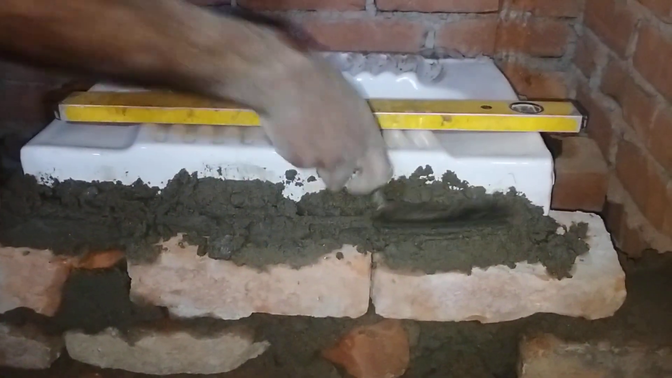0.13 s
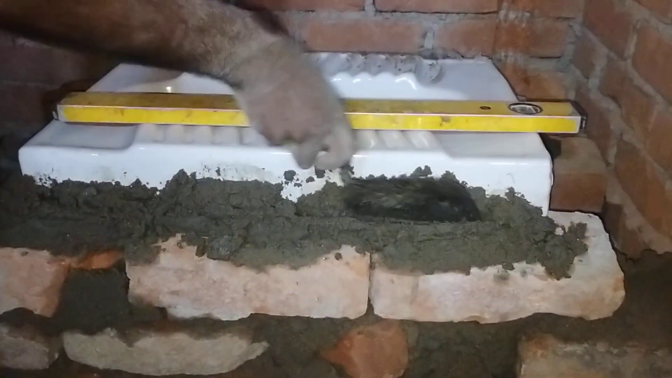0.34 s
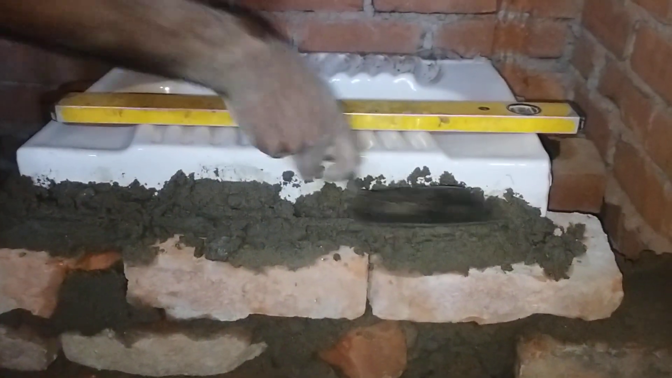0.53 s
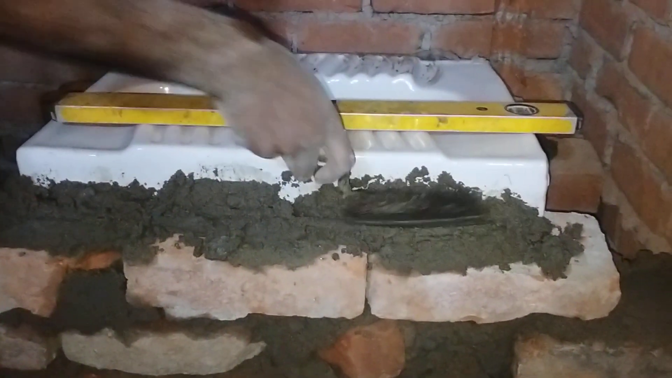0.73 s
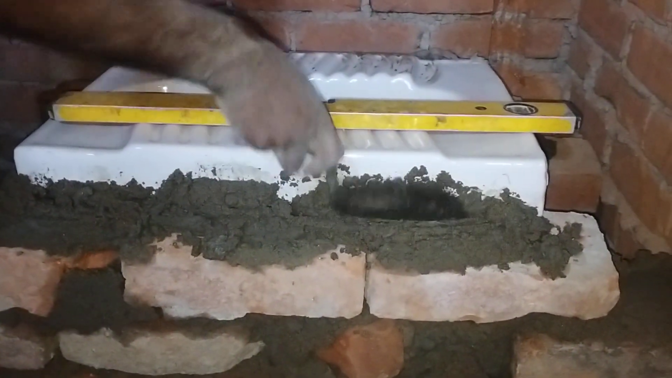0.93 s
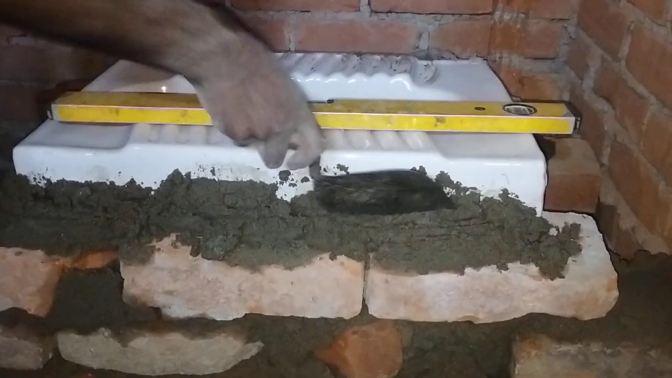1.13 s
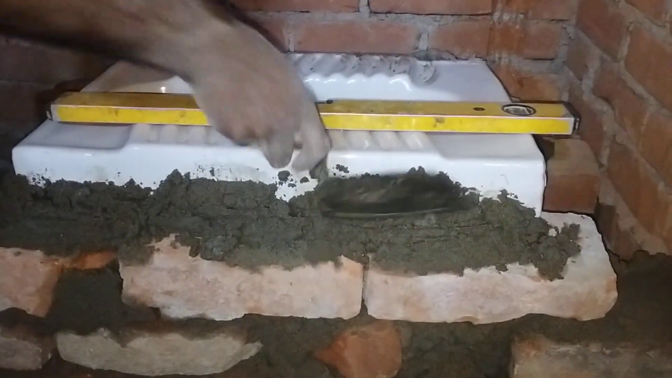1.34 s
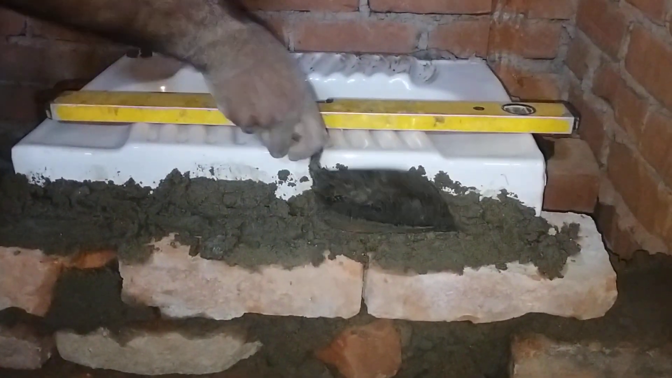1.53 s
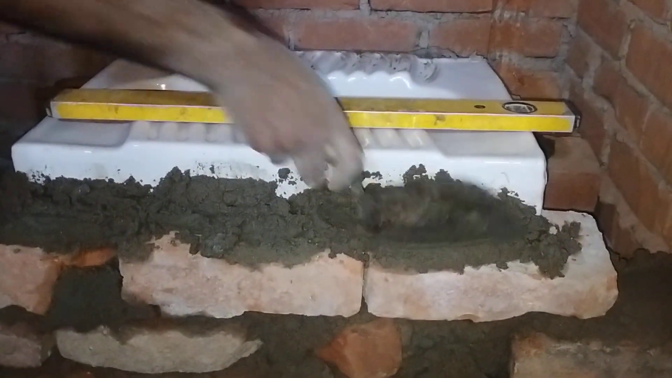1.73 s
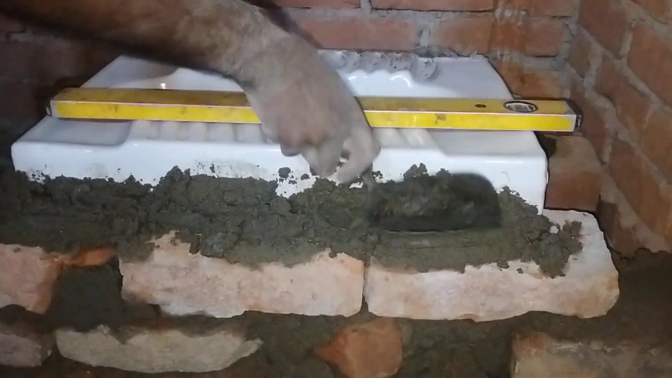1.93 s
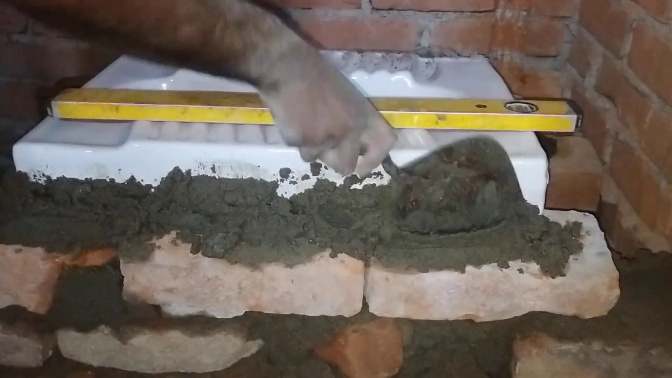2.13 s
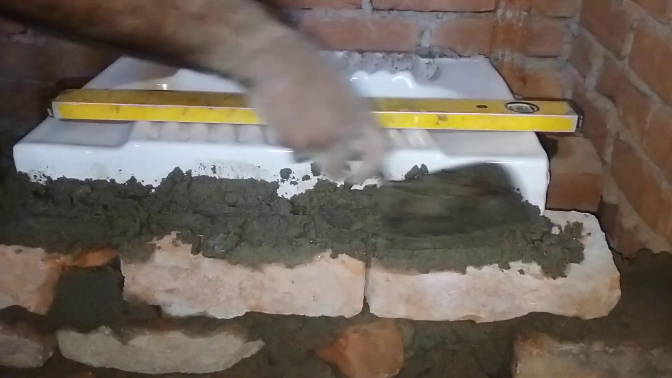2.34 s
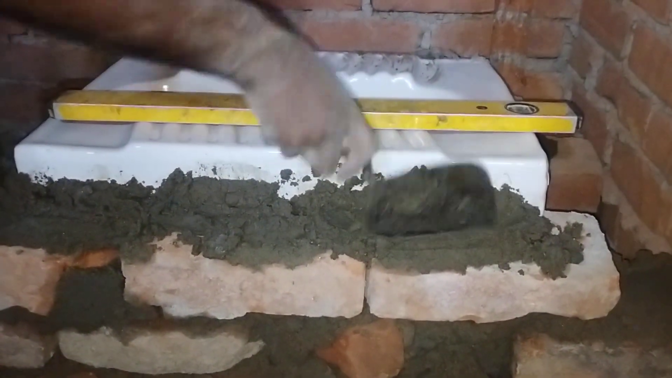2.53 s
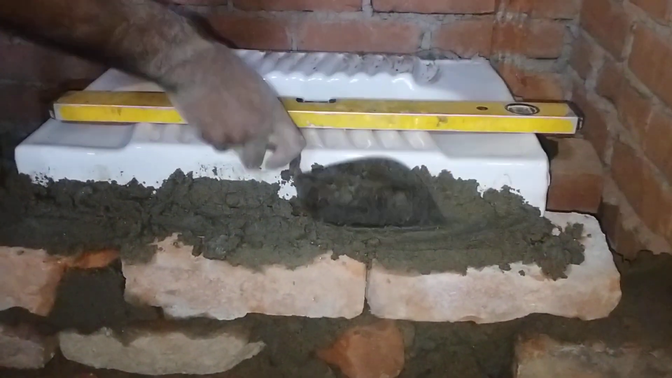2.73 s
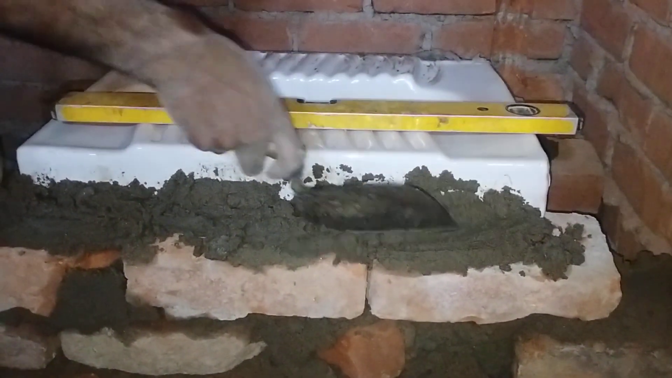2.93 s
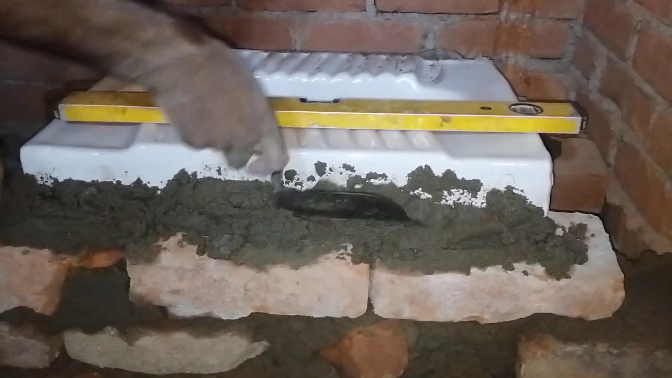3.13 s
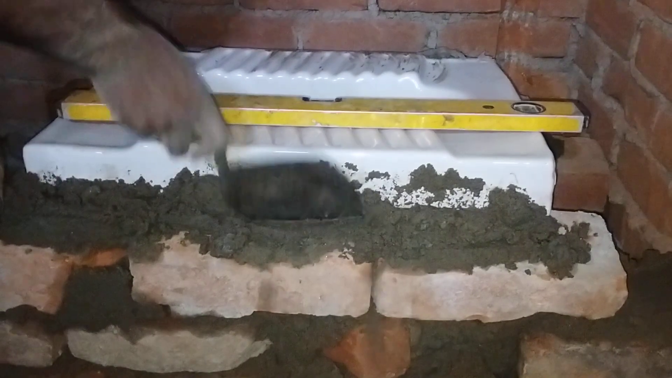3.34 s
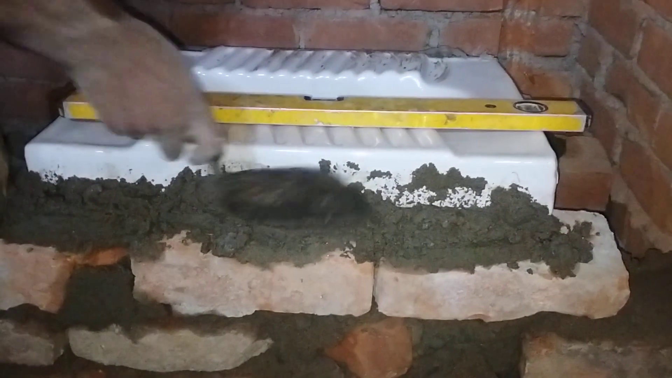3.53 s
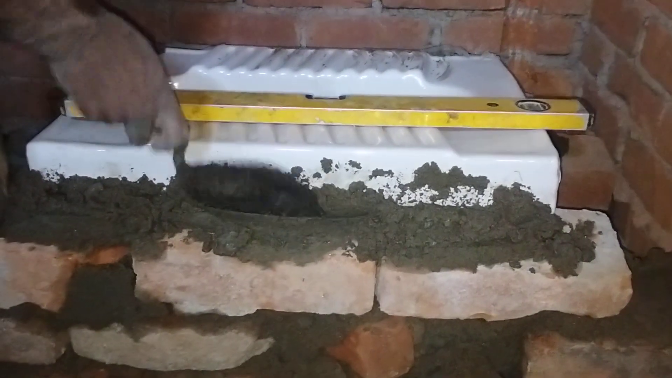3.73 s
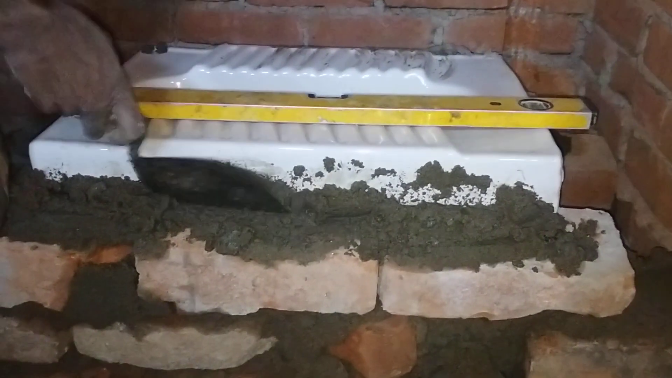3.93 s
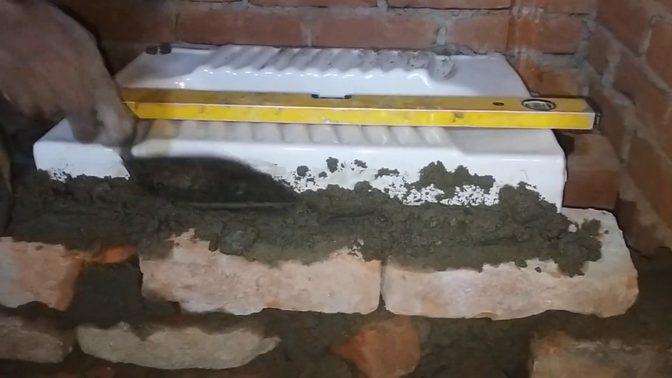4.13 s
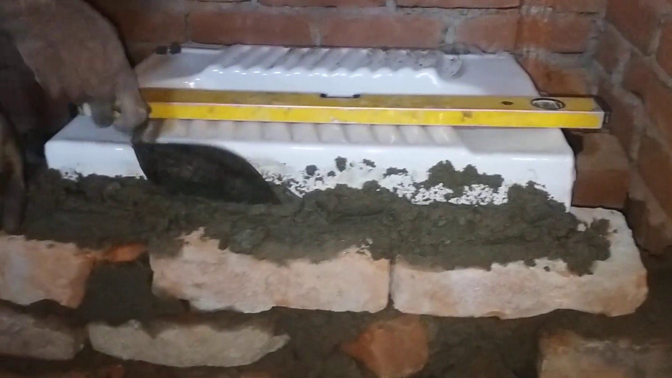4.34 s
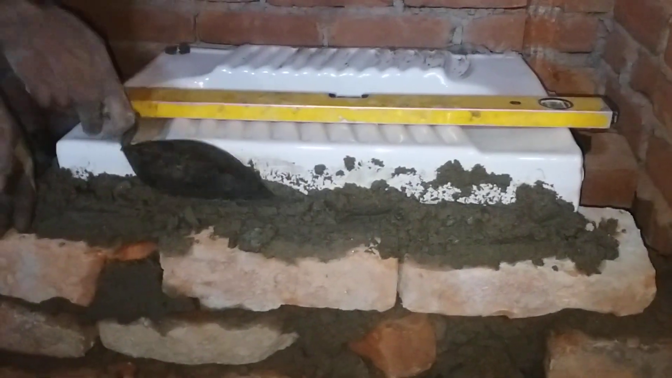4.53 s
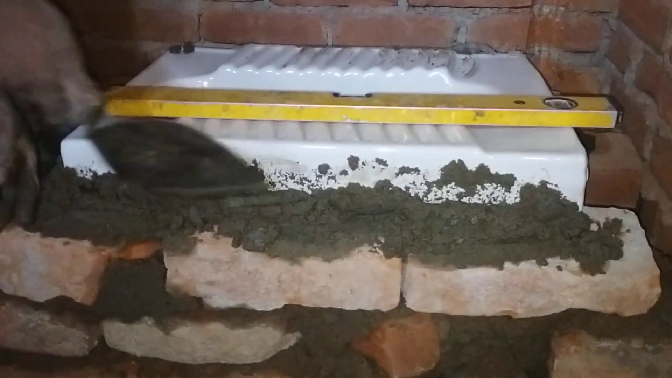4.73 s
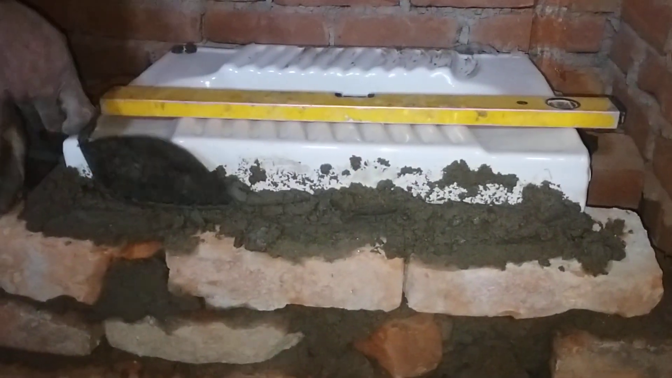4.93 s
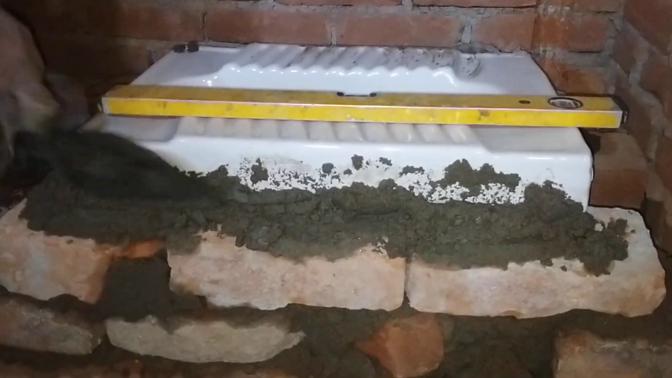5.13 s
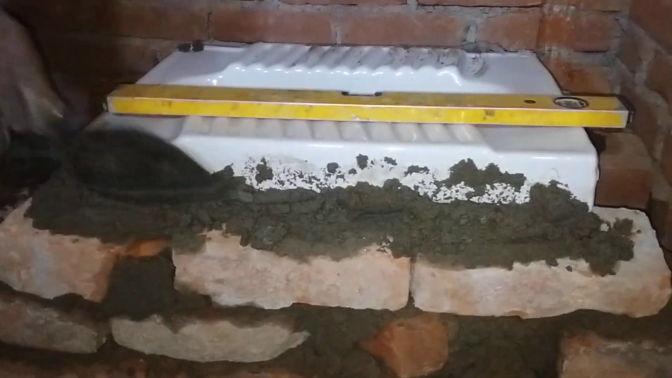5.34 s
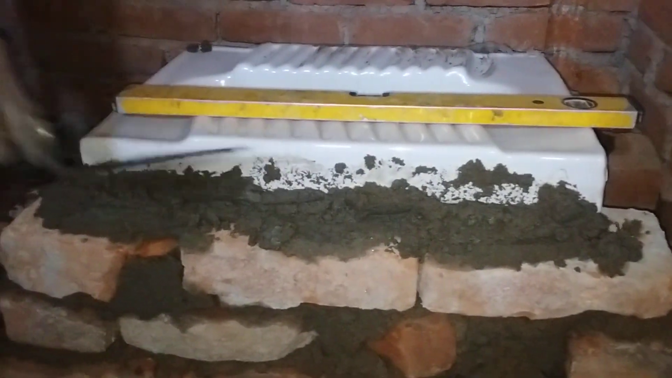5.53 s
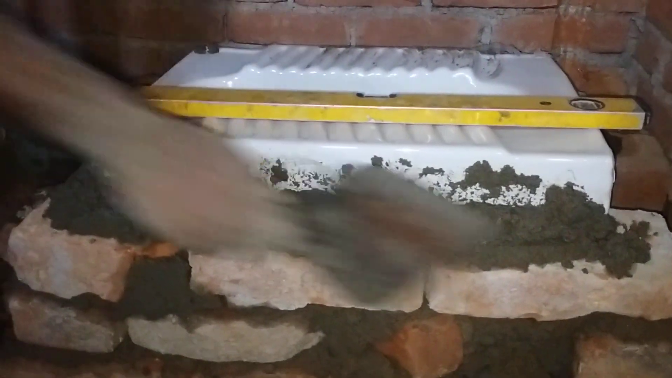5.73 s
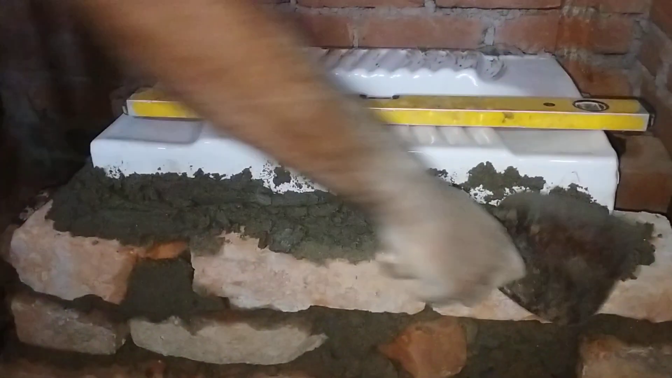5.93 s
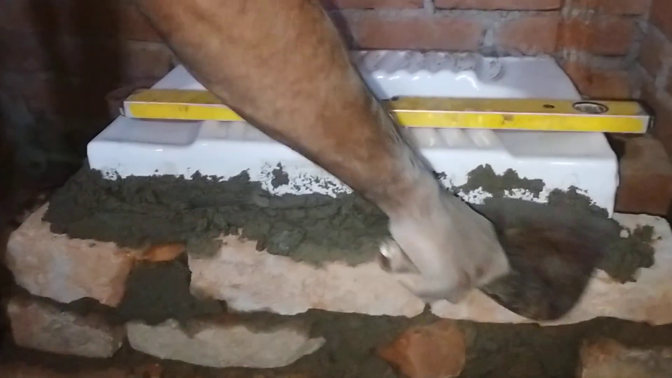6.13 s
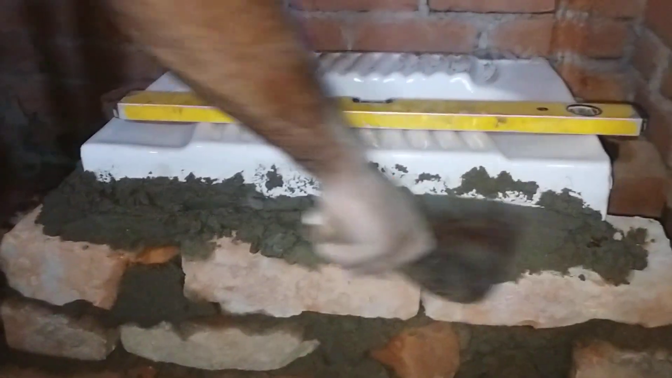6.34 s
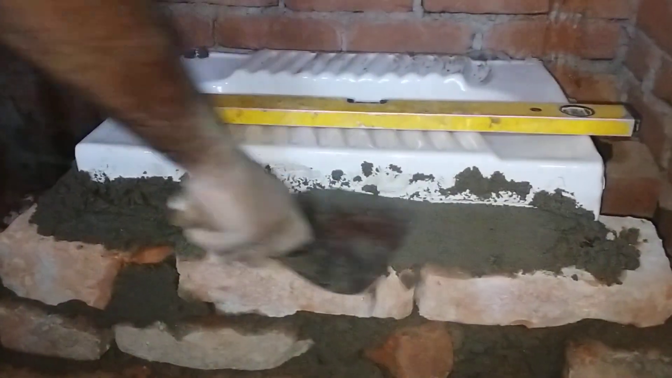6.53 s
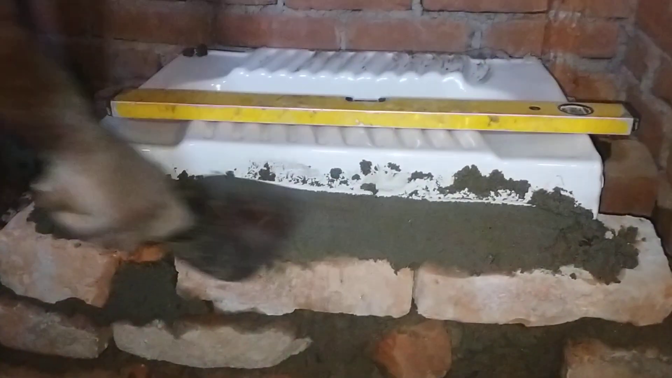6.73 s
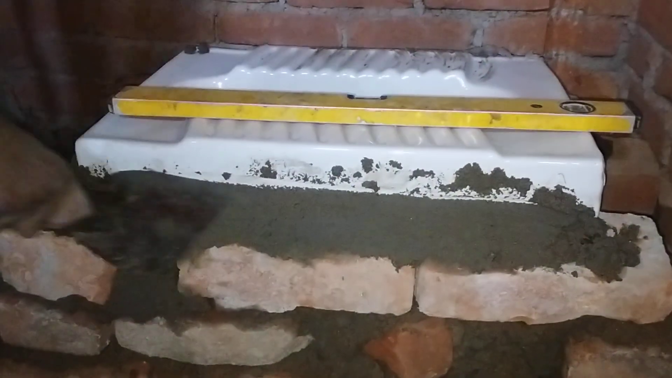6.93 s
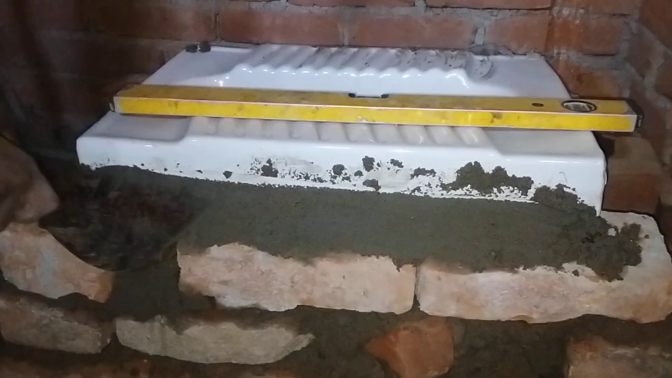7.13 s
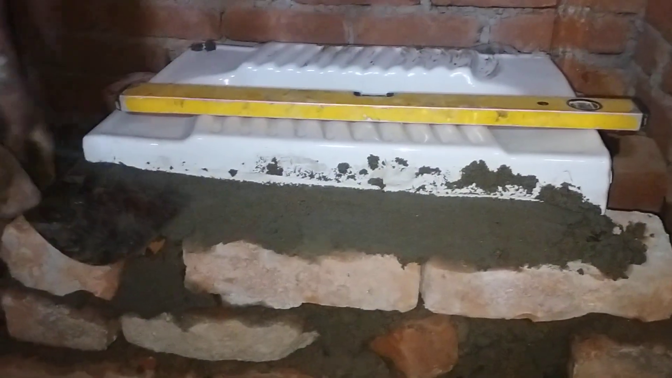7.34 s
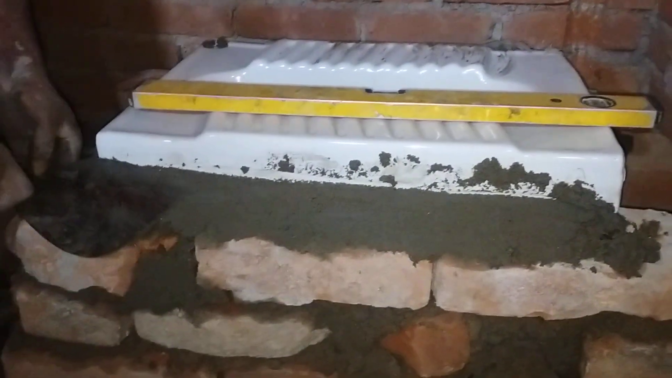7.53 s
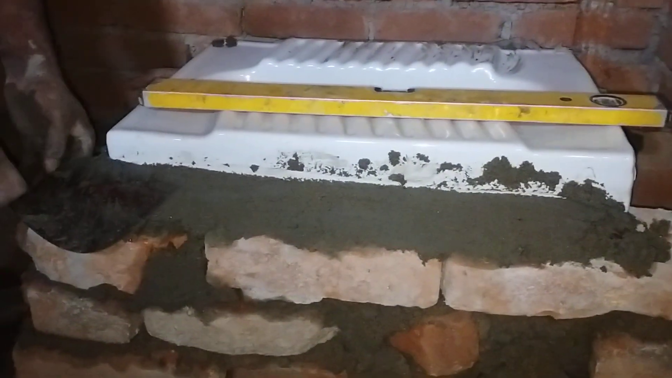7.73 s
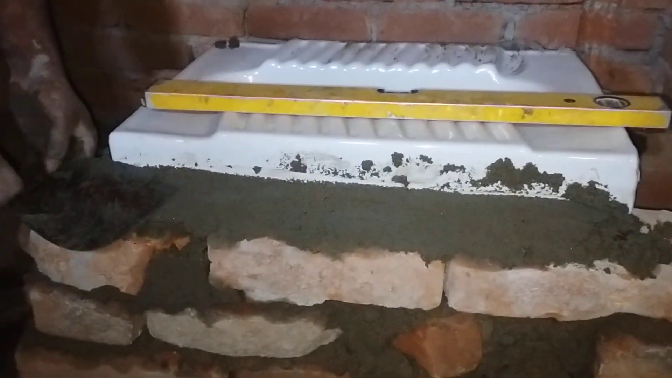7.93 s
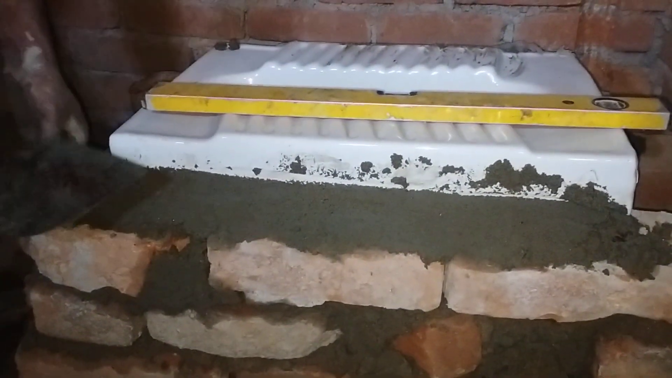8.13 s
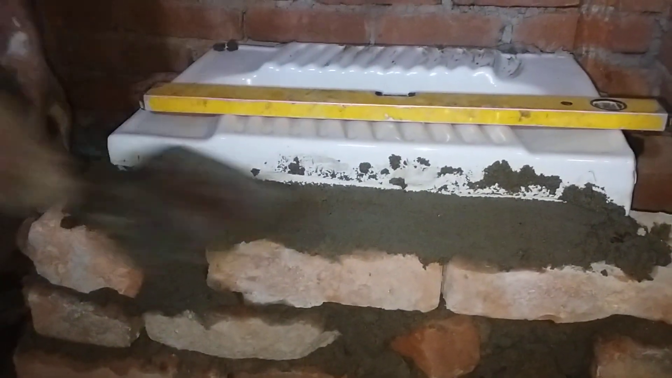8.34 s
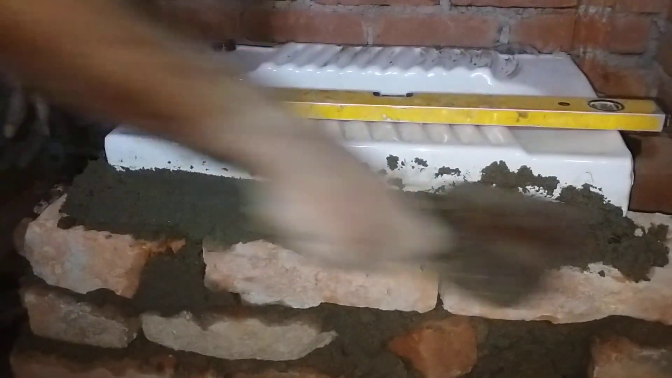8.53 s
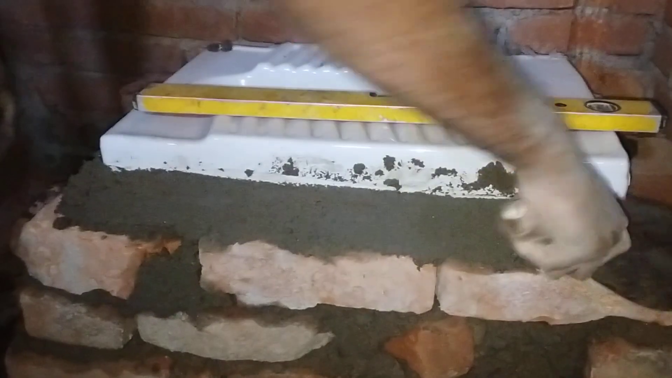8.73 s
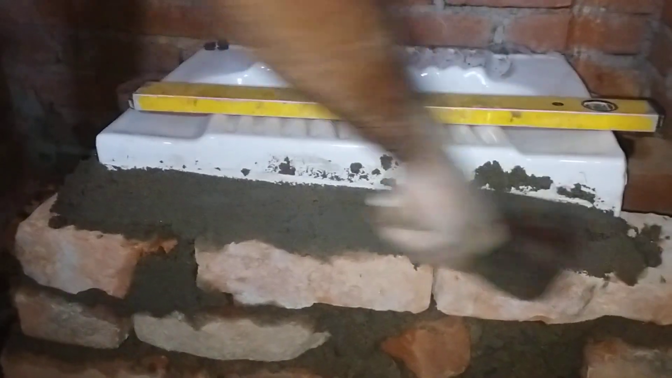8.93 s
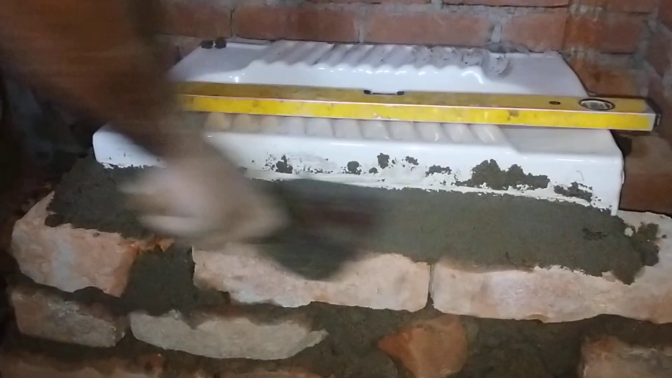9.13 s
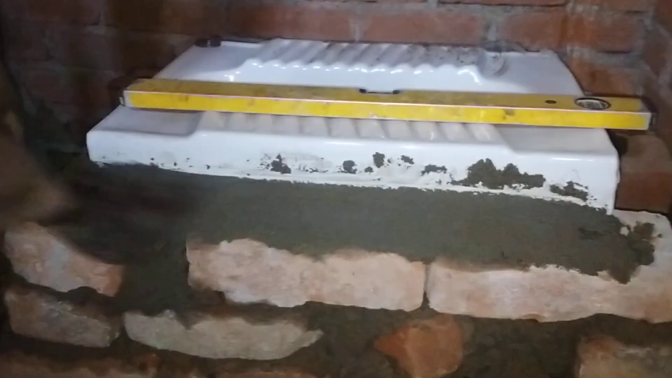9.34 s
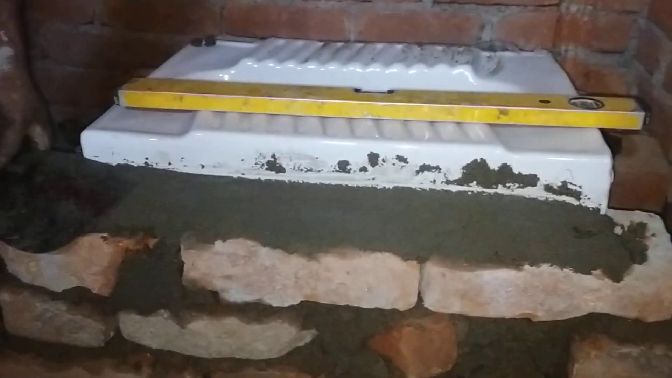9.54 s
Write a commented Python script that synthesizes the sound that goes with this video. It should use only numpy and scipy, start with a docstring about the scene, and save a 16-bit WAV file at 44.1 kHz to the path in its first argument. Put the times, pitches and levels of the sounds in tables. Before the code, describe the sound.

Brisk sandy pats of a trowel into wet cement, roughly three a second, followed by a long metallic scraping drag and a shorter, louder one.

```python
"""In a small bare room, a steel trowel pats wet mortar down along a row of bricks,
then smooths it in two long strokes.
Sand and paste are showers of tiny wavelets, and pebbles crack as short noise bursts.
The blade rings and hums, and the bed thuds, as noise passed through narrow resonances.
Quiet room noise lies under it all, and a mono phone microphone narrows the sound."""
import sys
import numpy as np
from scipy import signal
from scipy.io import wavfile
from scipy.ndimage import uniform_filter1d

SR = 44100
rng = np.random.default_rng(int(sys.argv[2]) if len(sys.argv) > 2 else 0)


def waveform_to_disk(signal):
    """Save audio, clipped to [-1, 1], as 16-bit WAV at the path in sys.argv[1]."""
    frames = np.transpose(np.atleast_2d(signal))
    scaled = np.clip(frames, -1, 1) * 32767
    samples = np.round(scaled).astype(np.int16)
    wavfile.write(sys.argv[1], SR, samples)


N = 426431  # length in samples

# Spectrum of the quiet room. Each row: frequency in Hz, relative level in dB per Hz.
HUSH_SPECTRUM = [(24, -47), (40, -17.5), (149, -2.5), (181, -8), (207, -10), (554, -14), (618, -12),
                 (770, -15), (1480, -16.5), (1890, -20), (4640, -20.5), (7510, -33.5), (9760, -69),
                 (16500, -120)]
# Spectrum of the grains. Each row: frequency in Hz, relative level in dB per Hz.
SAND_SPECTRUM = [(220, -46), (380, -26), (507, -11.5), (596, -19), (1100, -3), (1400, -1), (2740, 4.5),
                 (3610, -6.5), (5160, -13), (6000, -7.5), (7800, -37.5), (13200, -120)]
# Blade modes, damped by the mortar. Each row: frequency in Hz, width in Hz, gain in dB.
STEEL_MODES = [(1950, 59, -4.5), (2225, 81, -3.5), (2780, 72, -3.5), (3075, 110, 2), (3410, 120, -1),
               (4760, 380, 0), (5210, 480, 3.5)]
# Microphone response. Each row: frequency in Hz, gain in dB.
MIC_RESPONSE = [(70, -5.5), (130, -0.5), (220, 0.5), (330, -1), (5400, 0), (6200, -4), (6800, -15.5),
                (7500, -19.5)]
# Pats crunch, a flat drag hisses evenly. Each row: time in seconds, roughness (about 1 is very rough).
ROUGHNESS = [(0, 1.1), (5.6, 0.8), (6.3, .8), (6.5, .45), (7.9, .4), (8.9, .7), (9.67, 0.5)]
# Short drags as the blade lifts or shifts. Each row: middle in seconds, half length in seconds,
# coarse sand in dB, fine sand in dB over coarse, wet paste in dB over coarse (all before mixing).
DRAGS = [(-0.054, 0.169, -50.5, 3.5, -13), (0.255, 0.129, -54, 5.5, -19), (0.444, 0.013, -34, 6, -18),
         (0.545, 0.105, -50, 6.5, -19), (0.74, 0.066, -35, -21, -23), (0.822, 0.045, -43, -0.5, -19),
         (1.141, 0.06, -43, 6, -17.5), (1.377, 0.016, -31.6, 3.5, -18.5), (1.446, 0.044, -38, -3.7, -16),
         (1.72, 0.167, -57, 5, -19.5), (2.081, 0.088, -43, 5.5, -16.5), (2.322, 0.012, -37.5, -4, -14),
         (2.383, 0.06, -48.5, 7, -20.5), (2.613, 0.044, -36, 1, -19.5), (2.705, 0.039, -43.5, 1.5, -17.5),
         (2.922, 0.043, -40.5, 2.4, -18), (3.002, 0.111, -55.5, 3.2, -21.5),
         (3.209, 0.022, -39.5, 3.6, -18), (3.307, 0.051, -41, 1.5, -20), (3.555, 0.03, -44.5, -2.5, -8.5),
         (3.612, 0.11, -53.5, 1.5, -20.5), (3.934, 0.052, -63.5, 11.5, -21),
         (4.176, 0.019, -39.5, -0.5, -20), (4.246, 0.04, -52, 2.5, -23), (4.489, 0.018, -49, -11, -17.5),
         (4.579, 0.078, -59, 4, -25), (4.794, 0.051, -53, 3.5, -28), (5.147, 0.048, -45.5, 2, -21.5),
         (5.367, 0.027, -42, 9, -16.5), (5.458, 0.047, -44, 3.5, -21), (5.758, 0.079, -75.5, 6.5, -19),
         (5.912, 0.087, -74.5, 2.8, -21), (6.009, 0.049, -75, 0.1, -18), (8.208, 0.063, -66.5, 1.5, -20.5),
         (8.327, 0.084, -69.5, -3.5, -18.5), (8.664, 0.02, -71.5, 1.5, -19), (8.786, 0.155, -76, -6, -19.5)]
# Pats, and the landings that open a stroke. Each row: touch in seconds, rise in seconds, press in seconds,
# coarse sand in dB, climb through the press in dB, fine sand in dB over coarse, fall in dB per second,
# touch to bottom in seconds, wet paste in dB, thud in dB, brick rumble in dB,
# thud pitch in Hz before it sinks (levels before mixing).
PATS = [(0.075, 0.03, 0.018, -26.5, 2.7, 4.9, 289, 0.051, -38, -47.5, -50.5, 193.6),
        (0.362, 0.028, 0.024, -22.5, 14, 5.5, 263, 0.053, -43.5, -46.5, -57.5, 222.0),
        (0.663, 0.031, 0.011, -27.5, 4.5, 5, 147, 0.05, -40.8, -48.5, -50.5, 240.0),
        (0.953, 0.02, 0.019, -24.5, 13, 6, 331, 0.041, -47.5, -49, -66, 208),
        (1.035, 0.018, 0.0076, -29.5, 27, -0.5, 227.5, 0.029, -58, -60.5, -71, 212),
        (1.248, 0.033, 0.077, -26, -5, 0.3, 224.5, 0.052, -35.5, -47.5, -56, 215.0),
        (1.572, 0.016, 0.0087, -22.5, 9.5, 2.5, 284, 0.043, -38.5, -47.5, -43, 255),
        (1.892, 0.0088, 0.025, -25, 11.2, 5, 217, 0.032, -36.5, -42, -49.5, 189.6),
        (2.217, 0.013, 0.0062, -31, 10, 5.5, 175, 0.032, -36.5, -42, -47.5, 263),
        (2.501, 0.0073, 0.011, -35, 17, 9, 155, 0.011, -40, -45, -47, 212.0),
        (2.815, 0.01, 0.03, -27, 9.5, 4, 440, 0.0098, -41.5, -42.5, -44.5, 223.4),
        (3.105, 0.021, 0.02, -26.5, 12.5, 6.5, 169, 0.05, -38.5, -39.5, -52.5, 246.0),
        (3.433, 0.027, 0.002, -26, -2.5, 4, 309, 0.037, -35.5, -38, -45.5, 235.5),
        (3.74, 0.027, 0.012, -26.5, 13.5, 4.5, 204, 0.045, -40.5, -44.5, -48, 204),
        (4.044, 0.014, 0.024, -27.5, 7, 3, 170, 0.055, -38.5, -47.5, -46.5, 224),
        (4.354, 0.016, 0.025, -28.5, 4.5, 4, 183, 0.062, -43, -43, -50.5, 255.7),
        (4.624, 0.024, 0.022, -26.5, 9.5, 1, 216, 0.049, -43.5, -47.5, -61.5, 221.8),
        (4.951, 0.012, 0.0094, -29.5, 10.5, 5, 190, 0.038, -45, -45.1, -49.5, 197.3),
        (5.287, 0.015, 0.044, -33.5, 4.5, 4.5, 200.0, 0.068, -52.5, -58.5, -62.5, 205.8),
        (6.101, 0.0062, 0.022, -37.5, 15.5, 1.8, 504, 0.039, -56, -51.5, -67.5, 228),
        (6.146, 0.0081, 0.0035, -27, -3, -19, 350, 0.007, -53.9, -58, -79, 241),
        (8.049, 0.049, 0.045, -50, -0.5, -0.5, 460.0, 0.049, -65, -72.6, -76, 204.1),
        (8.923, 0.0077, 0.0086, -32.1, 16, 2.5, 228.0, 0.018, -45, -53, -64.7, 232.4)]
# Blade rings, pitched by its tilt and load. Each row: start in seconds, end in seconds, pitch in Hz,
# width in Hz, gain in dB on the grit that drives the ring.
RINGS = [(0.088, 0.205, 1860, 300, 7), (.1, .17, 760, 150, 1), (0.377, 0.502, 3200, 300, -4),
         (0.7, 0.737, 740, 200, 13.5), (1.036, 1.2, 3120, 300, 2), (1.037, 1.2, 5060, 500, 0),
         (1.425, 1.477, 4870, 500, 10.5), (0.797, 0.89, 5160, 500, -2), (0.776, .88, 3050, 300, 2),
         (.96, 1.03, 5000, 500, -4), (2.787, 2.874, 5540, 500, -7), (3.272, 3.354, 680, 150, -10),
         (3.46, 3.637, 655, 250, -6), (4.977, 5.095, 605, 200, -3), (2.5, 2.6, 3600, 300, 3),
         (2.5, 2.6, 5200, 400, 5.5), (6.097, 6.168, 1520, 110, 12), (6.154, 6.223, 2240, 250, -9.5),
         (6.33, 6.606, 1320, 150, -1.5), (6.554, 6.92, 2250, 250, 0), (6.862, 7.244, 1110, 250, 6.5),
         (6.91, 7.11, 1760, 200, 2.5), (7.3, 7.846, 2800, 250, -2), (7.43, 7.856, 1710, 250, 2),
         (7.25, 7.851, 1050, 250, -23), (8.08, 8.156, 2800, 250, 1.5), (8.082, 8.159, 4900, 397, -3),
         (9.01, 9.2, 1160, 150, -5), (9.0, 9.6, 2720, 250, -8.5)]
# Pebbles cracking on the steel. Each row: start in seconds, peak in dB before tone shaping, pitch in Hz.
PEBBLES = [(0.1062, -8.5, 3420), (0.127, -8, 1790), (0.418, -14, 4650), (0.471, -16.5, 5100),
           (0.708, -6, 5070), (0.9783, -8, 5140), (1.268, -0.5, 4100), (1.282, -16, 5160),
           (1.339, -13, 3080), (1.3737, -11, 2860), (1.4467, -25, 4900), (1.597, -12, 5160),
           (1.862, -53, 3000), (1.9062, -20, 4050), (2.2423, -4.5, 4520), (2.314, -21, 5000),
           (2.5187, -4.5, 5100), (2.705, -27, 2980), (3.1326, -18, 5540), (3.1478, 0.5, 5270),
           (3.4578, -17, 3950), (3.779, -19, 4260), (3.968, -44.5, 4400), (4.0957, -9, 4310),
           (4.402, -8.5, 4260), (4.912, -59, 3300), (4.9653, -18.5, 4680), (5.9144, -51, 3650),
           (6.0076, -55, 4030), (6.127, -19.5, 5200), (6.1525, -11.5, 2650), (6.243, -27, 2600),
           (6.2562, -17.5, 2670), (6.284, -12, 3520), (6.4258, -12, 5340), (6.4969, -20, 2495),
           (8.6305, -56, 1540), (8.774, -59, 2890), (8.789, -58, 2070), (8.884, -58, 4300),
           (8.9405, -19, 3840), (9.0105, -12, 2100), (9.3894, -10.5, 2730)]
# Two long strokes, one list each. Each row: time in seconds, coarse sand in dB before mixing,
# then fine sand, wet paste and thud, each in dB over coarse.
STROKES = [
    [(6.19, -43.5, -7, -19, -18), (6.234, -43.5, -2, -19, -26), (6.258, -32, 4, -30, -34),
     (6.272, -36.5, -3.5, -19, -28), (6.288, -30.5, -1, -29, -29), (6.302, -30.5, 0, -19, -25),
     (6.376, -36, 6, -27, -30), (6.4, -31, 1, -19, -24), (6.532, -33.5, 2.5, -6, -13),
     (6.566, -35.5, 3, -14, -25), (6.748, -32.5, 2, -18, -25), (6.788, -30.5, 1.5, -25, -33),
     (6.91, -32, 0, -32, -33), (6.94, -27.5, 0, -13.5, -17.5), (6.988, -28, 0.5, -28, -15),
     (7.052, -38.5, 1.5, -19, -17), (7.136, -38, 2, -46, -17.5), (7.184, -36.5, -3.5, -37, -26.5),
     (7.252, -47, -3.5, -26, -24.5), (7.502, -36.5, 0, -30, -30), (7.522, -39.5, -0.5, -31, -31),
     (7.626, -40.5, -2, -32, -31), (7.738, -36.5, 0.5, -30, -31), (7.822, -43, 0.5, -28, -25.5),
     (7.91, -84, -8.5, 0, -4), (7.95, -89, 4, -8.5, -14.5)],
    [(8.96, -37.5, -4.5, -16, -12), (8.974, -42, -6, -24, -16), (9.016, -25.5, 2.5, -22.5, -20),
     (9.12, -23.5, 0.5, -12.5, -14), (9.178, -31.5, 5.5, -16.5, -27.5), (9.292, -27.5, 1.5, -27, -28),
     (9.374, -30.5, 1, -19, -31), (9.38, -27.5, 3, -13, -32), (9.404, -18.5, -2, -23, -21),
     (9.454, -27, 2, -20, -33), (9.474, -22.5, -4.5, -19, -21), (9.514, -31, 4, -18.5, -17),
     (9.63, -36.5, -1, -26, -30), (9.67, -49, 0, -16, -6)],
]
# A squeak as the blade peels off. Each row: time in seconds, pitch in Hz, level in dB before flutter.
SQUEAK_GLIDE = [(8.16, 3850, -72), (8.19, 3880, -62), (8.22, 4220, -53), (8.24, 4300, -66),
                (8.27, 4240, -74)]
# Partials of the squeak. Each row: multiple of its pitch, level in dB.
SQUEAK_PARTIALS = [(.61, -10), (1.0, -3), (1.31, -6)]
# A faint whistle in the pause. Each row: time in seconds, pitch in Hz, level in dB.
WHISTLE_GLIDE = [(8.44, 1510, -95), (8.5, 1510, -82.5), (8.64, 1510, -81.5), (8.69, 1510, -92)]
# The free end of the blade hums in the last stroke. Each row: peak in seconds, rise in seconds,
# fall in seconds, first pitch in Hz, peak pitch in Hz, last pitch in Hz, peak level in dB before the mic.
HUMS = [(9.111, .15, 0.22, 252, 313, 302, -33), (9.44, .08, 0.25, 293, 280, 273, -35.5)]

HUSH_DB = -72
PASTE_LOW_HZ, COARSE_LOW_HZ, FINE_LOW_HZ, FINE_TOP_HZ = 380, 850, 3500, 6400  # edges of the grain sizes
GRAVEL_TOP_HZ, GRAVEL_DB = 1670, -0.5  # the largest stones move with the paste
DRAG_ENDS_DB, DRAG_HZ = -22, 190  # level at both ends under the middle; thud pitch
DRAG_THUD_DB, DRAG_RUMBLE_DB = -3.5, -5.5  # both over the paste
TOUCH_DB, SINK_DB = -33.5, -33  # drops of sand and bed at first touch
TOUCH_BEND = 1.24  # over 1: the sand sets in abruptly, then eases up to its level
SINK_BEND = 0.86  # under 1: the bed answers late and suddenly
LEAD_DB = 3  # boost of fine sand before the rise ends, and again before the press ends
DULL_DB, DULL_DB_PER_S = 5.5, 98.5  # fine sand dulls after the press, up to this much and at this rate
PASTE_FALL, THUD_FALL, RUMBLE_FALL = 170, 129, 103  # dB per second
SAG, SAG_S = 0.12, 0.38  # the thud sinks toward this share lower, with this time constant in seconds
STROKE_HZ = 228, 234  # thud pitch under each long stroke
STROKE_RUMBLE_DB = -21  # over the thud
HUM_ENDS_DB = -21.5  # under the peak of the hum
EDGE_HZ = 7660  # upper band limit


def gain_of(db):
    """Turns decibels into an amplitude factor."""
    return 10 ** (np.asarray(db) / 20)


def evened(x):
    """Scales a sound to rms 1."""
    return x / np.sqrt(np.mean(x ** 2) + 1e-20)


def read(points, hz):
    """Reads a spectrum between its points, on a log pitch scale."""
    f, value = np.transpose(points)
    return np.interp(np.log(hz + 1), np.log(f + 1), value)


def over_time(rows):
    """Spreads the columns after the time column to one value a sample."""
    s, *columns = np.transpose(rows)
    return [np.interp(np.arange(N) / SR, s, c) for c in columns]


def coloured(x, points):
    """Filters by a spectrum given as (Hz, dB) points."""
    hz = np.linspace(0, SR / 2, num=1025)
    taps = signal.firwin2(numtaps=2047, freq=hz, gain=gain_of(read(points, hz)), fs=SR)
    return signal.oaconvolve(x, taps, "same")


def resonate(x, hz, width_hz):
    """Shifts the pitch hz down to zero, smooths, and shifts back: a resonance of gain 1."""
    turn = np.exp(2j * np.pi * np.cumsum(hz * np.ones(len(x))) / SR)
    r = np.exp(-np.pi * width_hz / SR)
    smooth = signal.lfilter([1 - r], [1, -r], x / turn)
    return 2 * (turn * smooth).real


def wander(per_s):
    """A random curve of rms 1, made by smoothing noise twice."""
    width = int(SR / per_s)
    once = uniform_filter1d(rng.standard_normal(N), width)
    return evened(uniform_filter1d(once, width))


def fuzzy_tone(rows, width_hz, partials=((1, 0),)):
    """Noise in narrow resonances that follow a pitch curve, silent outside the table."""
    first, last = round(rows[0][0] * SR), round(rows[-1][0] * SR)
    hz, db = (c[first:last] for c in over_time(rows))
    noise = rng.standard_normal(len(hz))
    tone = np.zeros(len(hz))
    for multiple, partial_db in partials:
        narrow = resonate(noise, multiple * hz, multiple * width_hz)
        narrow = resonate(narrow, multiple * hz, 2 * multiple * width_hz)
        tone += gain_of(partial_db) * evened(narrow)
    out = np.zeros(N)
    out[first:last] = gain_of(db) * tone
    return out


def hush():
    """The quiet room: coloured noise whose level wanders a little."""
    noise = coloured(rng.standard_normal(N), HUSH_SPECTRUM)
    return gain_of(HUSH_DB + 1.1 * wander(per_s=8)) * evened(noise)


def room(x):
    """Near walls: sparse echoes of random sign that die quickly."""
    t = np.arange(SR // 4) / SR
    signs = rng.choice([-1., 1.], size=len(t))
    present = (rng.random(len(t)) < .05) * (t > .003)
    taps = signs * present * gain_of(-60 * t / 0.11)  # 60 dB down in 0.11 s
    return signal.oaconvolve(x, taps / np.linalg.norm(taps))[:N]


def grain(hz, turns):
    """A short wavelet with a quick start, energy 1; more turns make it ring longer."""
    u = np.arange(int(4 * turns * SR / hz)) * hz / SR / turns
    shape = u * np.exp(-2.5 * u) * np.sin(2 * np.pi * turns * u)
    return shape / np.linalg.norm(shape)


def crunch(lo_hz, hi_hz, slips, per_s, spread_db, turns, count):
    """Grains of one size class, most small and a few large, released in the slips of the blade."""
    out = np.zeros(N)
    for hz in np.geomspace(lo_hz, hi_hz, num=2 * count + 1)[1::2]:
        size_db = spread_db * np.minimum(rng.exponential(size=N), 4)
        size = gain_of(size_db) * rng.standard_normal(N)
        # the mix is uneven: each grain size comes and goes
        patches = rng.standard_normal(N // 3000 + 2)
        place = np.linspace(0, len(patches) - 1, num=N)
        patchy_db = 1.9 * np.interp(place, np.arange(len(patches)), patches)
        clicks = size * (rng.random(N) < per_s / SR) * slips * gain_of(patchy_db)
        level = gain_of(read(SAND_SPECTRUM, hz)) * np.sqrt(hz)
        out += level * signal.oaconvolve(clicks, grain(hz, turns))[:N]
    return out / np.sqrt(uniform_filter1d(out ** 2, size=SR // 2))  # evens the level over half seconds


def steel(x):
    """The blade modes, damped by the mortar, ring along with x."""
    return sum(gain_of(db) * resonate(x, hz, width) for hz, width, db in STEEL_MODES)


def trowel():
    """Sand, paste and mortar bed all follow the moves of the blade."""
    coarse_gain, fine_gain, paste_gain, thud_gain, rumble_gain, thud_hz = motion()
    rough, = over_time(ROUGHNESS)
    # the blade sticks and lets go
    slips = gain_of(rough * (1.1 * wander(per_s=100) + 0.16 * wander(per_s=35)))
    coarse = crunch(COARSE_LOW_HZ, FINE_LOW_HZ, slips, per_s=450 / rough,
                    spread_db=1.9 * rough, turns=3.5, count=11)
    fine = crunch(FINE_LOW_HZ, FINE_TOP_HZ, slips, per_s=800 / rough,
                  spread_db=0.43 * rough, turns=3.42, count=6)
    paste = crunch(PASTE_LOW_HZ, COARSE_LOW_HZ, slips, per_s=240,
                   spread_db=1.2 * rough, turns=1.9, count=6)
    gravel = crunch(COARSE_LOW_HZ, GRAVEL_TOP_HZ, slips, per_s=300,
                    spread_db=2.2 * rough, turns=3.5, count=4)
    sand = coarse_gain * coarse + fine_gain * fine
    wet = paste_gain * (paste + gain_of(GRAVEL_DB) * gravel)
    grit = gain_of(-2.5) * sand + gain_of(-8.5) * steel(sand) + wet
    shake = slips * rng.standard_normal(N)
    thud = evened(resonate(resonate(shake, thud_hz, 120), thud_hz, 180))
    rumble = evened(resonate(resonate(shake, 128, 96), 170, 110))  # the loose bricks under the bed
    return grit + rings(grit) + thud_gain * thud + rumble_gain * rumble


def motion():
    """All moves of the blade add in power; the strongest thuds count most in the pitch."""
    t = np.arange(0, N / SR + .001, .001)
    moves = [drag(t, *row) for row in DRAGS] + [pat(t, *row) for row in PATS]
    moves += [stroke(t, rows, hz) for rows, hz in zip(STROKES, STROKE_HZ)]
    *levels_db, hz = np.array(moves).transpose((1, 0, 2))
    powers = gain_of(np.maximum(levels_db, -200)) ** 2
    thud = powers[3]
    curves = [np.sqrt(p.sum(axis=0)) for p in powers]
    curves.append((thud * hz).sum(axis=0) / thud.sum(axis=0))
    return [np.interp(np.arange(N) / SR, t, c) for c in curves]


def drag(t, middle, half, db, fine_db, paste_db):
    """A rounded swell of sand, with paste, thud and rumble that follow it."""
    coarse = db + DRAG_ENDS_DB * ((t - middle) / half) ** 2
    paste = coarse + paste_db
    return coarse, coarse + fine_db, paste, paste + DRAG_THUD_DB, paste + DRAG_RUMBLE_DB, DRAG_HZ + 0 * t


def pat(t, touch, rise, press, db, climb_db, fine_db, fall, bottom, paste_db, thud_db, rumble_db, hz):
    """Sand sets in, changes through the press and falls; paste and bed peak when the blade bottoms out."""
    age = t - touch
    coming = np.maximum(1 - age / rise, 0)  # 1 at touch, 0 after the rise
    unpressed = np.clip(1 - (age - rise) / press, 0, 1)  # 1 before the press, 0 after it
    after = np.maximum(age - rise - press, 0)
    settled = np.maximum(age - bottom, 0)
    coarse = db + TOUCH_DB * coming ** TOUCH_BEND - climb_db * unpressed - fall * after
    lead = LEAD_DB * (unpressed + np.minimum(coming, 1))
    fine = coarse + fine_db + lead - np.minimum(DULL_DB_PER_S * after, DULL_DB)
    sink = SINK_DB * np.maximum(1 - age / bottom, 0) ** SINK_BEND
    sink = sink - 500 * np.maximum(-age, 0)  # keeps the bed quiet before the touch
    paste = paste_db + sink - PASTE_FALL * settled
    thud = thud_db + sink - THUD_FALL * settled
    rumble = rumble_db + sink - RUMBLE_FALL * settled
    return coarse, fine, paste, thud, rumble, hz * (1 - SAG * (1 - np.exp(-settled / SAG_S)))


def stroke(t, rows, hz):
    """A long smoothing stroke follows its table and drops away steeply outside it."""
    s, *columns = np.transpose(rows)
    coarse, fine_db, paste_db, thud_db = (np.interp(t, s, c) for c in columns)
    outside = np.maximum(s[0] - t, 0) + np.maximum(t - s[-1], 0)
    coarse = coarse - 1500 * outside  # dB per second
    thud = coarse + thud_db
    return coarse, coarse + fine_db, coarse + paste_db, thud, thud + STROKE_RUMBLE_DB, hz + 0 * t


def rings(x):
    """The grit drives blade resonances; each ring swells and fades over its span."""
    out = np.zeros(N)
    for start, end, hz, width_hz, db in RINGS:
        span = slice(round(start * SR), round(end * SR))
        swell = signal.windows.tukey(len(x[span]), .5)
        out[span] += gain_of(db) * resonate(x[span], hz, width_hz) * swell
    return out


def pebbles():
    """Each crack is a burst of a few milliseconds around its pitch that also shakes the blade."""
    out, t = np.zeros(N), np.arange(900) / SR
    for s, db, hz in PEBBLES:
        # the stone crumbles as it cracks
        burst = rng.standard_normal(len(t)) * np.exp(-t / .0022) * np.minimum(t / .0004, 1)
        crack = resonate(resonate(burst, hz, 1500), hz, 3700) + gain_of(-12) * steel(burst)
        part = out[round(s * SR):][:len(t)]
        part += gain_of(db) * crack[:len(part)] / abs(crack).max()
    return coloured(out, [(300, -23.5), (1200, -11.5), (2000, 1.5), (6000, -1.5), (7500, -17.5)])


def squeak():
    """The blade peels off: a fuzzy tone with three partials and a fluttering level."""
    return fuzzy_tone(SQUEAK_GLIDE, 260, SQUEAK_PARTIALS) * gain_of(3 * wander(per_s=90))


def whistle():
    """A faint whistle in the pause: noise in a very narrow resonance."""
    return fuzzy_tone(WHISTLE_GLIDE, 25)


def hums():
    """The free end of the blade: each hum is a narrow noise band that swells, glides and dies."""
    out = np.zeros(N)
    for s, rise, fall, first_hz, hz, last_hz, db in HUMS:
        ends_db = db + HUM_ENDS_DB
        out += fuzzy_tone([(s - rise, first_hz, ends_db), (s, hz, db), (s + fall, last_hz, ends_db)], 32)
    return out


def scene():
    """The work and its echoes pass the microphone; room noise and whistle join after it."""
    work = trowel() + pebbles() + squeak() + hums()
    near = coloured(work + gain_of(-9.5) * room(work), MIC_RESPONSE)
    low_cut = signal.butter(4, 95, "highpass", fs=SR, output="sos")
    near = signal.sosfilt(low_cut, near)
    return np.tile(near + hush() + whistle(), (2, 1))  # the same sound on both sides


def record(dry):
    """The preamp rounds off the highest peaks; then the band limit."""
    rounded = .8 * np.tanh(dry / .8)
    band_limit = signal.firwin(numtaps=511, cutoff=EDGE_HZ, window=("kaiser", 9), fs=SR)
    return signal.oaconvolve(rounded, band_limit[None], "same")


dry = scene()
out = record(dry)
waveform_to_disk(out)
```